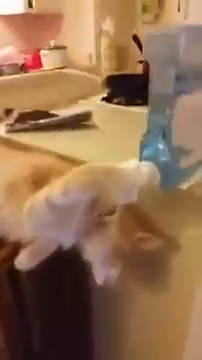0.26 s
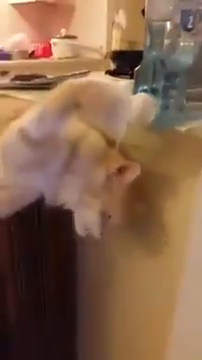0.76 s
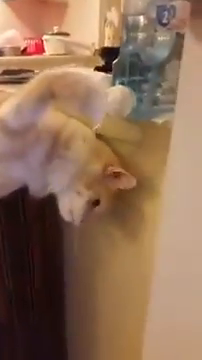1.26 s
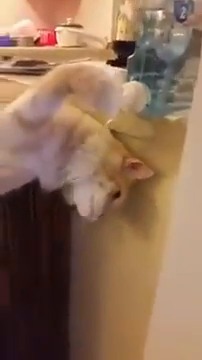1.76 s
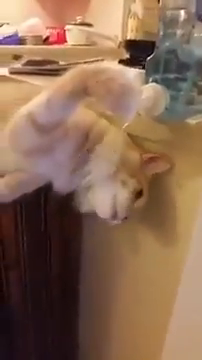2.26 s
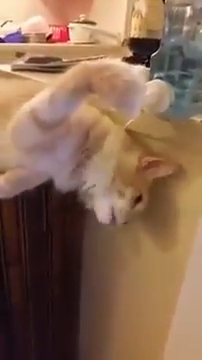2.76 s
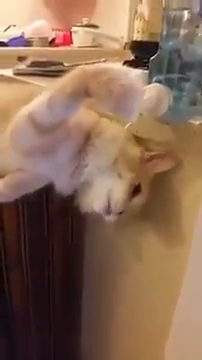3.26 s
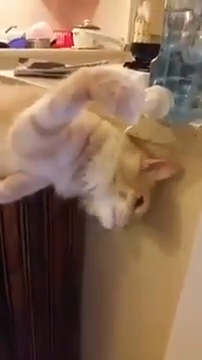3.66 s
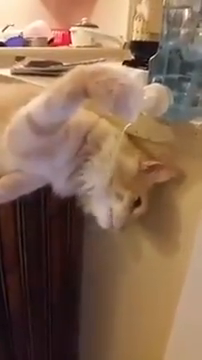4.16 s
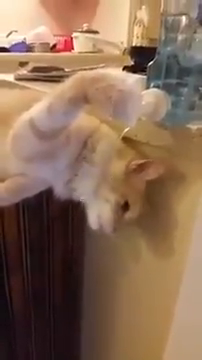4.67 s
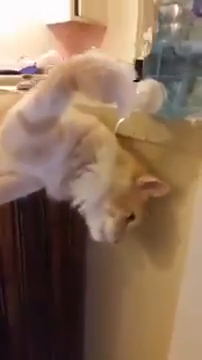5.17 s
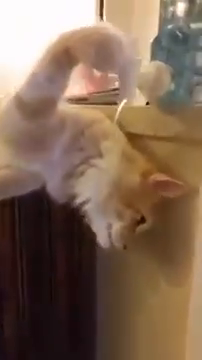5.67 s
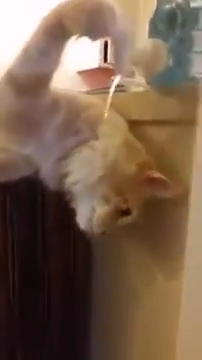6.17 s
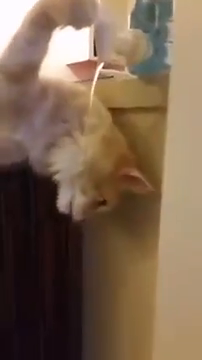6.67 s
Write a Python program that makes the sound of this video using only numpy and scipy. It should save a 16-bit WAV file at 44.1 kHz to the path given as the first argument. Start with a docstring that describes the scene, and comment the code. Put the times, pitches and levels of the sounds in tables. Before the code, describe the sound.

Small crisp water drops splash in uneven clusters with fine spray, off to the right, while a kitchen appliance hums quietly and the handheld microphone gets bumped.

```python
"""In a kitchen a thin stream of water runs over a cat and drips on the hard floor, right of a hand-held phone.
Each drop is a noise burst through its own slap resonance, with a bright spray and a room tail.
Fine spray patters between them as clumped grains, a smooth hiss fades early, and some bubbles plop.
An appliance hums behind as wavering tones over air noise; the hand bumps the phone with short low pushes."""
import sys
import numpy as np
from scipy import signal
from scipy.fft import rfft, irfft, next_fast_len
from scipy.io import wavfile
from scipy.ndimage import uniform_filter1d, map_coordinates

SR = 44100
rng = np.random.default_rng(int(sys.argv[2]) if len(sys.argv) > 2 else 0)


def undo_db(level):
    """Turn decibels back into plain size, where 20 dB means ten times bigger."""
    steps = np.asarray(level, float) / 20
    return 10 ** steps


def inscribe(sig):
    """Save sig as 16-bit PCM at rate SR to the path in sys.argv[1].

    A 1-D sig is mono; a 2-D sig holds one channel per row.
    Samples are clipped to [-1, 1] before scaling.
    """
    pcm = np.round(np.clip(np.atleast_2d(sig).T, -1, 1) * 32767)
    wavfile.write(sys.argv[1], SR, pcm.astype(np.int16))


N = 304729

# The clear drops. Each row: time in seconds, slap level in dB, slap pitch in Hz,
# bright spray in dB relative to the slap (held to 5 at most in the burst itself).
CLEAR_DROPS = [(0.248, -29, 5500, -17), (0.2521, -23, 3800, -24), (0.27, -10, 3770, -53),
               (0.32, -34, 6930, -12), (0.4094, -26, 6040, -37), (0.447, -34, 5500, -13),
               (0.5, -28, 5600, -8), (0.534, -36, 6000, -13), (1.18, -36.5, 4500, 1.5),
               (1.3385, -35, 6740, -40), (1.4052, -31.5, 7500, -5), (1.5216, -33, 6000, -35),
               (1.567, -33, 6600, -5), (1.6014, -24, 4400, -35), (1.632, -27, 7350, -18),
               (1.658, -30.5, 5500, -7), (1.6792, -26, 6260, -6), (1.7038, -25.5, 3300, -13),
               (1.719, -19, 3240, -15), (1.7678, -23, 4280, 2), (1.83, -25.5, 6000, -6),
               (1.882, -30, 4370, 3), (1.9226, -22.5, 6830, -6), (1.9624, -29.5, 4480, -19),
               (2.0077, -33, 4200, -17), (2.0311, -17.5, 6170, -14), (2.076, -30, 6600, 6),
               (2.164, -34.5, 6440, -11), (2.293, -29, 5700, -11), (2.3542, -31, 7800, -2),
               (2.39, -29, 6400, -7), (2.422, -29, 6440, -4), (2.679, -36.5, 8060, -5),
               (2.932, -44, 6500, -10), (2.969, -40.5, 6440, 0), (3.0083, -32, 6300, -8),
               (3.0939, -30.5, 6300, -5), (3.13, -32.5, 6500, -5), (3.1611, -26, 5970, -17),
               (3.197, -28, 5370, -5), (3.2383, -25.5, 4140, -7), (3.483, -40, 7300, 30),
               (3.737, -53, 4950, -17.5), (3.875, -42, 6470, -4), (4.0444, -24, 6500, -3),
               (4.203, -30.5, 2680, -6), (4.24, -31.5, 3550, -3), (4.2917, -29, 6050, -10),
               (4.3432, -23.5, 4120, -35), (4.42, -33.5, 3370, -9), (4.441, -35.5, 6560, 0),
               (4.4899, -26.5, 6840, -2.5), (4.542, -26.5, 5360, -11), (4.6017, -25, 2970, -6),
               (4.663, -35, 6440, -0.5), (4.853, -30.5, 8500, -6), (4.928, -30.5, 6560, 0),
               (5.098, -19, 5940, -14), (5.131, -29, 4760, -3), (5.181, -24, 4400, -11),
               (5.215, -22.5, 5970, -17), (5.2609, -24.5, 4160, 22), (5.3372, -17.5, 4500, -8.5),
               (5.3778, -31.5, 3400, -11), (5.454, -27, 3680, -5), (5.4853, -20.5, 4220, -22),
               (5.5442, -17.5, 3800, -27), (5.573, -31, 4740, -10), (5.5879, -18, 3900, -33),
               (5.641, -25.5, 3870, -30), (5.685, -10.5, 2900, -47), (5.7384, -19.5, 5630, -7),
               (5.779, -31.5, 2700, -3), (5.837, -32.5, 2030, -5), (5.8582, -24, 7440, -4),
               (5.9129, -29, 8750, 9), (5.962, -34, 4700, -9), (6.027, -24, 5000, -3),
               (6.07, -24.5, 6450, 36), (6.0932, -22.5, 3900, -26), (6.1548, -18, 4100, -10.5),
               (6.2504, -24.5, 4400, -8), (6.261, -30, 4100, -18), (6.302, -37, 4200, -10),
               (6.342, -34, 4000, -13), (6.356, -25.5, 3680, -5), (6.3912, -30.5, 4100, -4),
               (6.419, -31.5, 2100, -1), (6.469, -30.5, 4160, -17), (6.503, -32.5, 3700, -2),
               (6.534, -32.5, 6700, 19), (6.5927, -19, 7000, -9.5), (6.644, -35.5, 2750, -8),
               (6.703, -31.5, 4700, -13), (6.7352, -28, 8100, -5), (6.788, -32.5, 4140, -8),
               (6.831, -27.5, 10500, -41), (6.875, -34.5, 4200, 15)]
# Colour of the fine water noise. Each row: frequency in Hz, relative density in dB per Hz.
WATER_COLOUR = [(710, -17), (1200, -4.5), (1860, 8.5), (2420, 7), (3880, 10.5), (7910, 10), (13500, 7),
                (15300, 12), (16000, -26.5)]
# Stereo tilt of the direct water, before the phone's swing. Each row: frequency in Hz, left minus right in dB.
WATER_SIDE = [(1000, 6), (3000, -13.5), (8000, -18), (15000, -16.5)]
USUAL_DB = -28  # level of a usual drop


def unit(x):
    """Scales to rms 1 along the last axis."""
    return x / np.sqrt(np.mean(x ** 2, -1, keepdims=True) + 1e-20)


def peaked(x):
    """Scales to peak 1 along the last axis."""
    return x / np.abs(x).max(-1, keepdims=True)


def along(points, hz):
    """Reads (Hz, value) points on a log frequency axis."""
    f, v = np.transpose(points)
    return np.interp(np.log(hz + 1), np.log(f + 1), v)


def curve(rows):
    """Draws (seconds, value) rows as one value per sample."""
    return np.interp(np.arange(N) / SR, *np.transpose(rows))


def wobble(rate):
    """A smooth random curve with rate knots a second."""
    knots = rng.standard_normal(int(N * rate / SR) + 4)
    return map_coordinates(knots, [np.arange(N) * rate / SR])


def filtered(x, response):
    """Multiplies the spectrum of x by a response of frequency."""
    m = next_fast_len(2 * x.shape[-1])
    spectrum = rfft(x, m) * response(np.fft.rfftfreq(m, 1 / SR))
    return irfft(spectrum, m)[..., :x.shape[-1]]


def sides(balance, hz):
    """Left and right gains for a left-right difference in dB."""
    return undo_db(np.multiply.outer([.5, -.5], along(balance, hz)))


def peak(hz, centre_hz, q):
    """A causal resonance of gain 1 at its centre."""
    damping = 1j * hz * centre_hz / q
    return damping / (centre_hz ** 2 - hz ** 2 + damping)


def placed(times, sounds):
    """Sums stereo sounds (event, channel, sample) at their times in seconds."""
    out = np.zeros((2, N + sounds.shape[-1]))
    for s, sound in zip(times, sounds):
        start = max(round(s * SR), 0)
        out[:, start:][:, :sounds.shape[-1]] += sound
    return out[:, :N]


def hum(air_db=-2, lag=0.65):
    """Wavering motor lines, lag radians apart in the ears, over room air that is alike in both in the bass only."""
    # Each row: time in seconds, level in dB.
    hum_level = [(0, -47), (1.7, -46.5), (3.6, -47), (5.5, -46.5), (5.8, -50), (6.91, -52.5)]
    # Each row: pitch in Hz, middle level in dB before the hum level, random knots of its waver a second.
    motor_lines = [(51.5, -5, 1.01), (85.9, -7.5, 14), (170.2, -4, 9), (252, -10, 16), (867, -22, 2.995)]
    # Each row: frequency in Hz, relative density of the air noise in dB per Hz.
    air_colour = [(40, -5), (96, -7), (170, -3.5), (290, -11), (460, -11.5), (545, -19), (950, -21),
                  (1150, -28.5), (3300, -37.5), (5000, -63), (6900, -30.5), (10500, -81), (13000, -38),
                  (15300, -67.5)]
    # Each row: frequency in Hz, left-right likeness of the air noise (1 = same in both ears).
    likeness = [(60, 1), (300, 0.95), (640, 0.4), (1400, 0.097)]
    # Each row: frequency in Hz, left minus right in dB.
    hum_side = [(40, -7.5), (85, -2.5), (300, 1), (600, -0.5)]
    t = np.arange(N) / SR
    ears = np.array([[lag], [-lag]]) / 2
    lines = 0
    for hz, db, waver in motor_lines:
        level = undo_db(db + 2.4 * wobble(waver))
        lines = lines + level * np.sin(2 * np.pi * hz * t + 2.22 * wobble(waver) + ears)

    def mid_side(f):
        angle = np.arccos(np.clip(along(likeness, f), -1, 1)) / 2
        return undo_db(along(air_colour, f)) * [np.cos(angle), np.sin(angle)]

    mid, side = filtered(rng.standard_normal((2, N)), mid_side)
    gusts_db = 1.7 * wobble(8)
    air = undo_db(air_db + gusts_db) * unit(np.array([mid + side, mid - side]))
    return undo_db(curve(hum_level)) * filtered(lines + air, lambda f: sides(hum_side, f))


def wetness_db():
    """Spray level: the powers of a running trickle and of what every drop throws up, which lingers, add."""
    # Fine spray that runs on between the drops. Each row: time in seconds, level in dB.
    trickle = [(0, -75.5), (.25, -74), (.6, -48), (.9, -62), (1.15, -55.5), (1.25, -48.5), (1.5, -54.5),
               (2.5, -50), (2.9, -76), (3, -46), (3.35, -66), (3.83, -98.5), (3.95, -50.5), (4.75, -58),
               (5.4, -41.5), (6.1, -49.5), (6.91, -57)]
    thrown_db, grows = -44, 0.7  # spray thrown by a usual drop; dB of spray per dB of drop
    lead_s, linger_s = .003, 0.031  # the thrown power sets in fast and hangs on
    s, db, _, spray_db = np.transpose(CLEAR_DROPS)
    coarse = np.arange(N)[::64]
    t = coarse[:, None] / SR - s
    strength_db = thrown_db + grows * (db - USUAL_DB) + 0.11 * np.minimum(spray_db, 0)
    rise = np.exp(np.minimum(-t / lead_s, 50))
    fall = np.exp(np.minimum(t / linger_s, 50))
    thrown = undo_db(2 * strength_db) / (rise + fall)
    power = undo_db(2 * curve(trickle)) + np.interp(np.arange(N), coarse, thrown.sum(1))
    return 10 * np.log10(power)


def spray(rate=120, spread_db=7, life=0.0042, diffuse_db=-4, apart=1.0):
    """Many droplets as noise grains of random strength, in clumps, over a blurred wash that swells with them."""
    # Resonances of the droplets in Hz: small drops ring high, large ones low.
    droplet_hz = [1400, 2800, 4300, 7000, 12000]
    clumps, t = wobble(25), np.arange(512) / SR
    grain = t / life * np.exp(-2 * t / life)  # power of one grain, life in seconds
    near = 0
    for hz in droplet_hz:
        hits = rng.random(N) < rate / SR * undo_db(4 * clumps)  # rate: hits a second at the middle of the clumps
        power = hits * undo_db(2 * spread_db * np.clip(rng.standard_normal(N), -3, 1.3))
        shape = np.sqrt(np.abs(signal.fftconvolve(power, grain)[:N]))
        noise = rng.standard_normal((3, N))
        grains = unit(shape) * (noise[:1] + apart * noise[1:])  # a shared part plus one for each ear
        near = near + filtered(grains, lambda f: peak(f, hz, 1.88) ** 2 * sides(WATER_SIDE, f))
    swell_db = 2.5 * uniform_filter1d(clumps, size=600)
    blur = undo_db(diffuse_db + swell_db) * rng.standard_normal((2, N)) * undo_db([[-2.2], [2.2]])
    wet = filtered(near + blur, lambda f: undo_db(along(WATER_COLOUR, f)))
    return undo_db(wetness_db()) * wet / wet.std()


def hiss():
    """Even noise without grains in the water's colour; it swells a little early on, then sinks away."""
    # Each row: time in seconds, level in dB.
    hiss_level = [(.42, -48), (.52, -48), (.76, -45), (.88, -67)]
    noise = filtered(rng.standard_normal((2, N)),
                     lambda f: undo_db(along(WATER_COLOUR, f)) * sides(WATER_SIDE, f))
    return undo_db(curve(hiss_level)) * noise / noise.std()


def bumps(cycles=0.67):
    """The phone's case is pushed: a damped sine that dies within one or two low cycles."""
    # Each row: start in seconds, peak level in dB, pitch in Hz, left minus right in dB.
    pushes = [(0.03, -31.5, 125, -8), (0.071, -35, 94.2, -22), (0.13, -32.5, 167, -1.0),
              (0.59, -32.5, 81, -9), (4.955, -34.5, 72, -9), (5.17, -33.5, 87.5, 4),
              (5.613, -24.5, 260, 18.5)]
    s, db, hz, pan_db = np.transpose(pushes)[..., None]
    t = np.arange(4096) / SR
    push = np.sin(2 * np.pi * hz * t) * np.exp(-t * hz / cycles) * (1 - np.exp(-t / 0.00021))
    mono = (undo_db(db) * peaked(push))[:, None]
    return placed(s[:, 0], mono * undo_db(pan_db[:, None] * [[.5], [-.5]]))


def echoes(count, size):
    """A fresh room tail of energy 1 per drop and ear; each frequency dies at its own speed."""
    # Reverberation of the kitchen. Each row: frequency in Hz, time to fall by 60 dB in seconds.
    kitchen = [(1000, 0.88), (3500, 0.26), (8000, 0.3), (15000, 0.062)]
    hz, t, z = signal.stft(rng.standard_normal((count, 2, size)), SR, nperseg=256)
    fading = z * undo_db(-60 * t / along(kitchen, hz)[:, None])
    tail = signal.istft(fading, SR, nperseg=256)[1][..., :size]
    return unit(tail) / np.sqrt(size)


def drops(q=2.65, wide_db=-6, room_db=-9, apart=0.73, body_db=-32):
    """A drop bursts in a sharp core inside a softer spread: noise with a slap resonance and a bright spray."""
    s, db, slap_hz, spray_db = np.transpose(CLEAR_DROPS)[..., None, None]
    t = np.arange(1024) / SR - .005
    # hard drops are abrupt
    slow = undo_db(1.2 * rng.standard_normal(s.shape) - .2 * (np.maximum(db, -45) - USUAL_DB))
    rise, fall, halo = .0007 * slow, .0022 * slow, .38  # core times in seconds, share of the spread

    def swell(up, down):
        return 1 / (np.exp(-t / up) + np.exp(t / down))

    burst = swell(rise, fall) + halo * swell(1.7 * rise, 4 * fall)
    noise = rng.standard_normal((len(s), 2, 3, len(t)))
    # the splash is wide: the ears differ
    noise = (noise[:, :, :1] + apart * noise[:, :, 1:]) * burst[:, None]
    wide = undo_db(wide_db + 0.55 * spray_db)  # a drop that sprays much is broad in colour
    late = .0005 * (0.353 + rng.random(s.shape))  # delay of the bounce in seconds
    # the dull thud of the water's weight
    body = undo_db(body_db + 7.8 * rng.standard_normal(s.shape) - 0.24 * (db - USUAL_DB))

    def slap_colour(f):
        no_bass = (f / 1900) ** 4 / (1 + (f / 1900) ** 4)
        # a near surface throws the sound back and bands its colour
        bounce = 1 + 0.98 * np.exp(-2j * np.pi * f * late)
        ring = peak(f, slap_hz, q) ** 2 + wide * bounce * peak(f, slap_hz, 0.57)
        return ring * no_bass + body * peak(f, 1120, 2.1) ** 2

    slap = filtered(noise[:, 0], slap_colour)
    bright = filtered(noise[:, 1], lambda f: peak(f, 14400, 2.8) ** 2)
    sound = undo_db(db) * (peaked(slap) + undo_db(np.minimum(spray_db, 5)) * peaked(bright))
    direct = filtered(sound, lambda f: sides(WATER_SIDE, f))
    room = undo_db(room_db) * signal.fftconvolve(sound, echoes(len(s), size=12000), axes=-1)
    return placed(s.ravel() - .004, direct) + placed(s.ravel() + 0.0017, room)


def plops(life=.0052, rise=.05, rough=1.3):
    """Bigger drops trap air: a short-lived, unsteady bubble tone whose pitch climbs."""
    # Each row: start in seconds, level in dB, starting pitch in Hz.
    bubbles = [(1.988, -48.5, 920), (2.078, -46, 1760), (3.913, -48, 1200), (4.076, -41.5, 934),
               (4.557, -40, 2656), (5.18, -44, 904), (6.42, -41.5, 980), (6.593, -38, 2360),
               (6.896, -38.5, 915)]
    s, db, hz = np.transpose(bubbles)[..., None]
    t = np.arange(2048) / SR
    jitter = uniform_filter1d(rng.standard_normal((len(s), 2, len(t))), size=40)
    shake = rough * unit(jitter)  # phase in radians, apart in each ear
    tone = np.sin(2 * np.pi * (hz * t * (1 + rise * t / 0.038))[:, None] + shake)
    fading = tone * np.exp(-t / life) * (1 - np.exp(-t / 0.075))
    return placed(s[:, 0], undo_db(db)[:, None] * peaked(fading))


def scene():
    """Water, hand and room together; as the phone swings, the water moves further right."""
    # Added stereo tilt of all the water. Each row: time in seconds, left minus right in dB.
    swing = [(0, 8.5), (5.7, 6), (6.1, 2)]
    water = (drops() + spray() + plops() + hiss()) * undo_db(curve(swing) * [[.5], [-.5]])
    return water + bumps() + hum()


def roll_off(x):
    """The treble ends steeply here."""
    return signal.sosfilt(signal.butter(12, 16980, fs=SR, output="sos"), x)


def record(dry):
    """The microphone falls off in the deep bass (41 Hz) and steeply at the top (15300 Hz)."""
    heard = filtered(dry, lambda f: 1 / np.sqrt((1 + (f / 15300) ** 60) * (1 + (41 / (f + 1)) ** 4)))
    return roll_off(heard)


dry = scene()
out = record(dry)
inscribe(out)
```